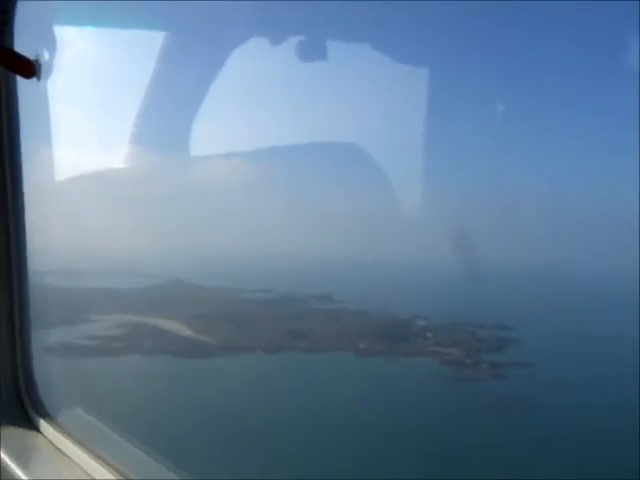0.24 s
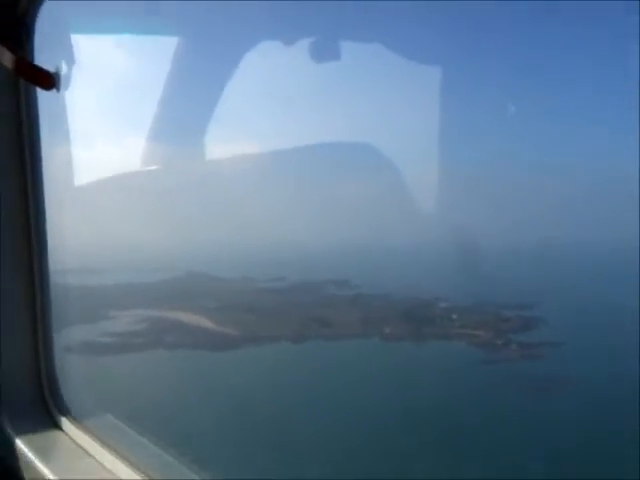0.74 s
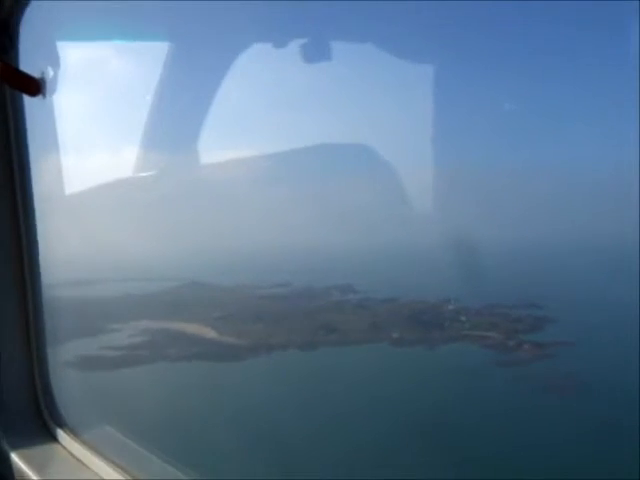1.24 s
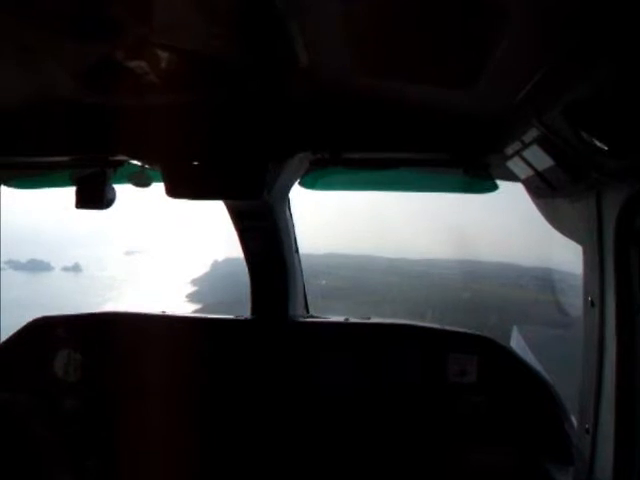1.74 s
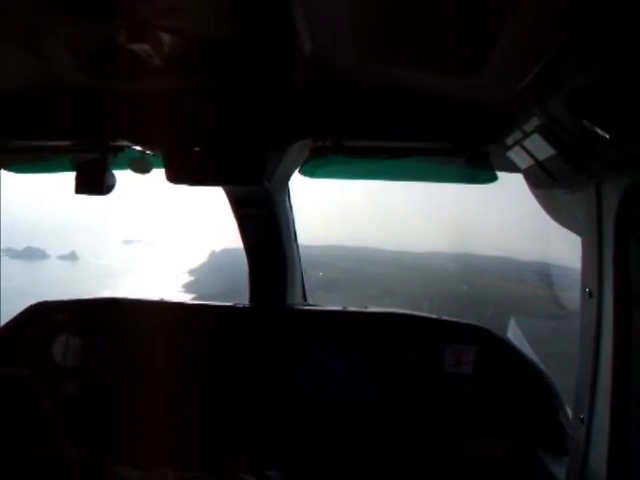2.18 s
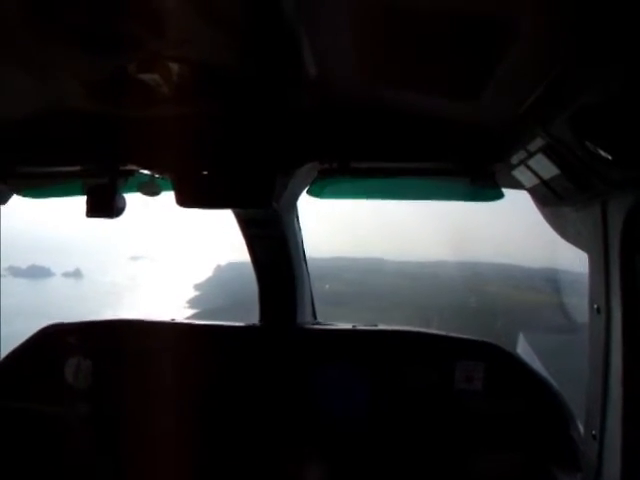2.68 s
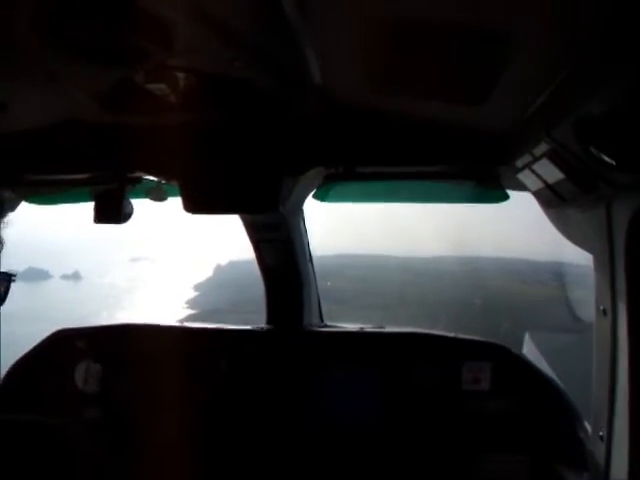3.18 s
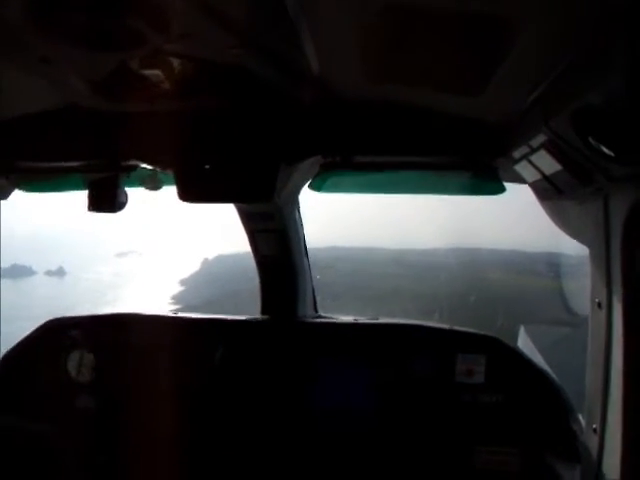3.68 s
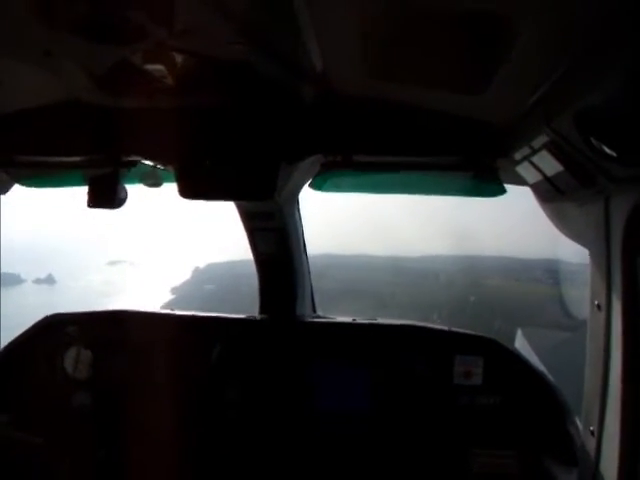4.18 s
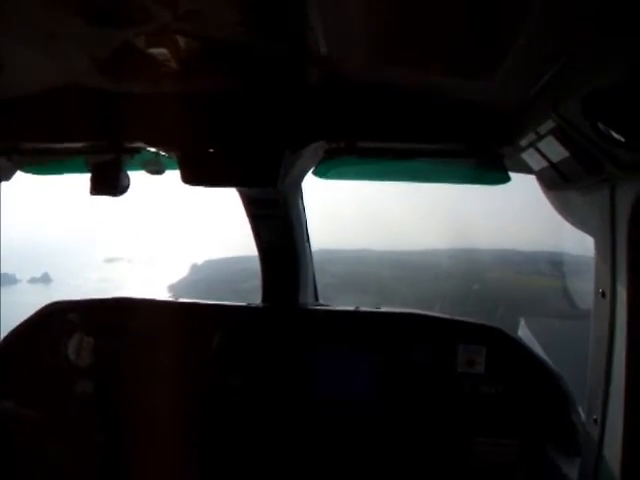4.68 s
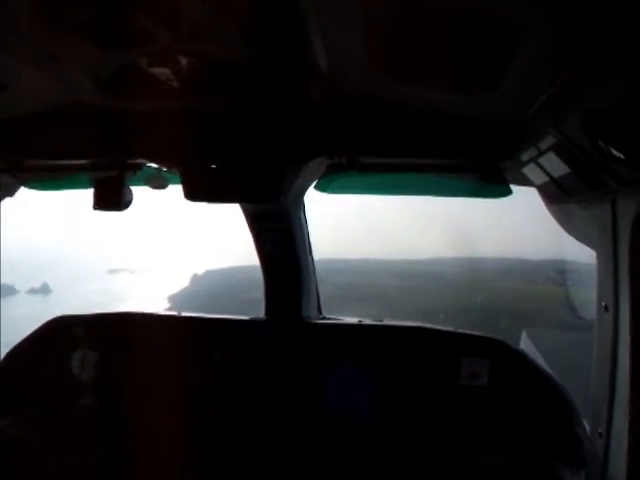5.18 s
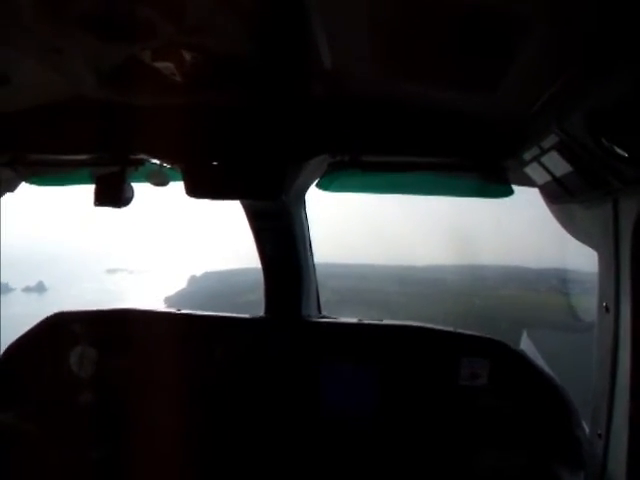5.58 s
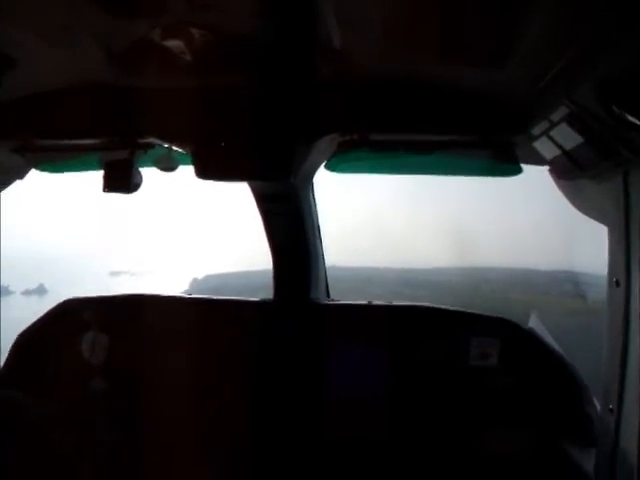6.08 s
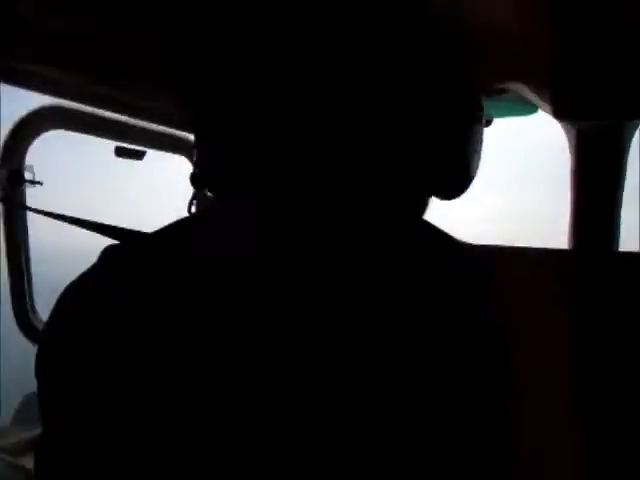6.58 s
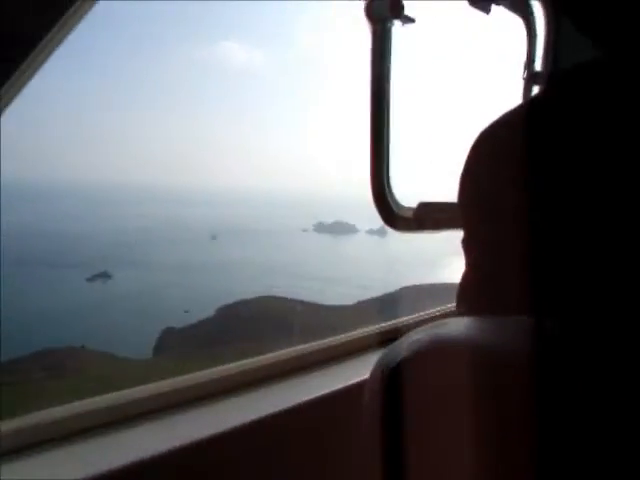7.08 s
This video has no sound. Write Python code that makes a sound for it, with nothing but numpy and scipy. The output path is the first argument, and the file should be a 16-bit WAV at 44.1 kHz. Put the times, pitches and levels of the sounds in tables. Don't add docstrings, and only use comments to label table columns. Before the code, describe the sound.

Inside the cabin of a small piston-engined propeller aircraft in flight, captured close by a compressed microphone with dull, limited treble. From 0 to 1.3 s the engines turn in step as one low, smooth drone around 115 Hz; the deep tone thins near 0.3 s and swells back, over airflow rumble and faint whistling vents around 1 kHz. At about 1.33 s there is an abrupt silence of a fortieth of a second. The drone returns higher, rougher and more buzzing, climbing until roughly 2.6 s, then easing slightly. Engines at different speeds throb quickly, slower at first and then about a dozen beats a second, with a low propeller thrum, roaring and hissing air and light trim buzz. From 6.25 to 7 s the engine tone changes colour, briefly hollower, as the listener turns to the side window. The drone continues to the end at 7.3 s.

```python
import sys
import numpy as np
from scipy import signal
from scipy.io import wavfile

SR = 44100
rng = np.random.default_rng(int(sys.argv[2]) if len(sys.argv) > 2 else 0)


def level_to_linear(level):
    exponent = np.asarray(level, float) / 20
    return 10 ** exponent


def pcm_store(signal):
    levels = np.round(np.clip(np.atleast_2d(signal), -1, 1) * 32767)
    wavfile.write(sys.argv[1], SR, levels.astype(np.int16).T)


N = 323241

DROPOUT_S = (1.33446, 1.35946)

# cruise [level/dB], its fall [dB/s], share of the slipstream swing [dB/dB],
# later [level/dB], its share [dB/dB]
AIRFLOW = [
    (-31, .1, .1, -28, 0.34),
    (-36.5, -0.2, 0.48, -36.5, 0.97),
    (-40, 2, 0.18, -41.5, 1.1),
    (-52, -1.7, 0.54, -42.5, 1.1),
]
# [f/Hz], spectral density [level/dB]
AIR_CRUISE = [(20, 4.5), (60, 2), (150, 2), (300, -7), (500, -12), (850, -22), (1050, -21.5), (1300, -20),
              (1600, -23), (2500, -20.5), (4500, -24), (6000, -31.5), (7500, -26.5)]
AIR_LATER = [(20, 1), (60, 4.5), (150, 0), (300, -7), (500, -15), (850, -19), (1050, -18.5), (1300, -23.5),
             (1600, -23.5), (2500, -21.5), (4500, -22.5), (6000, -29.5), (7500, -23.5)]
# [t/s], [level/dB]
SLIPSTREAM = [(0, -0.2), (.2, 2), (.5, 1.4), (1.05, 0.2), (1.33, 3), (1.36, 3), (1.55, 2.5), (2.2, 1.5),
              (3.4, -0.1), (4.3, -0.2), (4.9, 0.7), (5.5, -0.1), (6.7, 0.7), (7.33, -2.5)]
# [f/Hz], bandwidth [f/Hz], rms [level/dB]
VENT = [
    (980, 69, -48.5),
    (1022, 47, -45),
    (1140, 70, -50.5),
    (1544, 120, -53),
    (2560, 330, -55),
]
# [f/Hz], bandwidth [f/Hz], against the sizzle [level/dB]
TRIM = [
    (4700, 430, -9),
    (6180, 290, -8.5),
]

# [t/s], [f/Hz]
CRUISE_SPEED = [
    (0.0, 115.0),
    (0.22, 114.18),
    (0.44, 114.34),
    (0.67, 114.6),
    (0.89, 114.98),
    (1.11, 115.15),
    (1.33, 115.06),
]
# [t/s], [f/Hz]
NEAR_SPEED = [(1.36, 127.17), (1.66, 131.29), (1.96, 134.15), (2.26, 135.84), (2.6, 136.68), (3.0, 136.62),
              (3.5, 135.33), (4.34, 133.59), (5.3, 134.08), (6.4, 133.61), (7.33, 132.93)]
FAR_SPEED = [
    (1.36, 122.58),
    (1.8, 124.05),
    (2.95, 124.2),
    (4.6, 122.72),
    (5.6, 122.11),
    (6.5, 120.81),
    (7.33, 119.38),
]
TAIL_SPEED = [
    (1.36, 117.68),
    (1.96, 114.15),
    (2.6, 114.37),
    (3.8, 112.2),
    (4.94, 113.15),
    (6.14, 112.01),
    (6.73, 113.47),
    (7.33, 110.59),
]
START_TURNS = [
    .25,
    .989,
    .05,
    .78,
]

# [sixths of the firing rate], [level/dB]
CRUISE_ORDERS = [(1, 0.5), (2, -7), (3, -10.5), (4, 2), (5, -6.5), (8, -11), (9, -12.5), (30, -23)]
CRUISE_SLIP_ORDERS = [(9, -16.5), (18, -25)]
TAIL_ORDERS = [(2, -38.5), (4, -28.5), (6, -32), (8, -42.5), (12, -54.5)]
FAR_ORDERS = [(2, -37.5), (3, -33.5), (6, -21), (12, -39.5), (18, -48.5), (24, -52), (30, -56.5)]
NEAR_LOW_ORDERS = [(1, -36), (3, -30.5), (4, -47.5), (8, -41), (9, -41.5)]
NEAR_BARK_ORDERS = [(24, 0.9)]
NEAR_MID_ORDERS = [(36, 0.78)]
NEAR_WHINE_ORDERS = [(60, -0.5), (66, -6), (72, 0), (78, -10.5), (84, -0.9), (90, -6.5)]

GOVERNED_HZ = 133.8
NEAR_LAYERS = [
    (-13, -.2, 0.64),
    (-22.5, .3, 0),
    (-38.5, -0.0062, 0),
    (-34, 0.64, 0.4),
    (-48.5, 1, 1.85),
    (-42, -1.2, -2),
    (-57, -.4, 3.2),
    (-38, -1, -0.3),
    (-55, -.3, 3),
    (-48, 0.62, -0.4),
]
TURN_S = [
    6.25,
    6.5,
    6.72,
    7.0,
]
# leaning, node, side [level/dB]
NEAR_TURN = [
    (2, 2.5, 0.9),
    (-2.2, -11.5, -3),
    (6.5, -1, 6.5),
    (-2.5, -0.5, -0.3),
    (11, 4, 2),
    (-1.5, -4, -3),
    (5.5, -7, -1),
    (1.5, 0.5, -3.5),
    (9.5, 6, 2.5),
    (-0.5, -1, -2.5),
]


def rms_one(x):
    return x / np.sqrt(np.mean(x ** 2) + 1e-20)


def in_time(rows):
    s, *columns = np.transpose(rows)
    return [np.interp(np.arange(N) / SR, s, column) for column in columns]


def at_hz(points, hz):
    f, db = np.array(points).T
    return np.interp(np.log(hz), np.log(f), db)


def drift(rate_hz):
    r = np.exp(-80 * np.pi * rate_hz / SR)
    noise = rng.standard_normal(N // 40 + 2002)
    slow = signal.lfilter([1], [1, -2 * r, r * r], noise)[2000:]
    return np.interp(np.arange(N) / 40, np.arange(len(slow)), rms_one(slow))


def whistles(modes, flicker_db):
    out = 0
    for hz, width_hz, db in modes:
        r = np.exp(-np.pi * width_hz / SR)
        poles = [1, -2 * r * np.cos(2 * np.pi * hz / SR), r * r]
        x = rng.standard_normal(N)
        for _ in range(2):
            x = signal.lfilter([1, 0, -1], poles, x)
        out = out + level_to_linear(db + flicker_db * drift(5.3)) * rms_one(x)
    return out


def vents(later):
    slipstream_db, = in_time(SLIPSTREAM)
    return ~later * level_to_linear(slipstream_db) * whistles(VENT, flicker_db=0.5)


def air_levels(later, beat_turns):
    throb_peak_db, fade_s, sharpness, lag_turns = 3.5, 0.67, 1.4, .73
    s = np.arange(N) / SR
    swing_db, = in_time(SLIPSTREAM)
    fade = np.exp(-np.maximum(s - DROPOUT_S[1], 0) / fade_s)
    beat = np.cos(2 * np.pi * (beat_turns - lag_turns))
    throb_db = throb_peak_db * fade * (np.exp(sharpness * (beat - 1)) - .4)
    levels_db = []
    for db, fall, share, late_db, late_share in AIRFLOW:
        cruise_db = db - fall * s + share * swing_db
        levels_db.append(np.where(later, late_db + late_share * swing_db + throb_db, cruise_db))
    return level_to_linear(levels_db)


def band_shares(colour, centres, layer):
    share = level_to_linear(at_hz(colour, centres)) * np.sqrt(centres)
    return share / np.sqrt(np.bincount(layer, share ** 2))[layer]


def airflow(later, levels, shake, patchy_db):
    edges = 18 * 2 ** np.arange(0, 9.4, 1 / 3)
    centres = np.sqrt(edges[1:] * edges[:-1])
    layer = np.searchsorted([290, 2000, 4300, 8500], centres).clip(0, 3)
    cruise_share = band_shares(AIR_CRUISE, centres, layer)
    later_share = band_shares(AIR_LATER, centres, layer)
    white = rng.standard_normal((2, N + SR))
    gust = drift(7.0)
    shade_low_hz, shade_high_hz, shade_db = 850, 2100, -2.5
    shade = level_to_linear(np.interp(np.arange(N) / SR, TURN_S[1:3], [0, shade_db]))
    out = np.zeros((4, N))
    for k, (low, high) in enumerate(zip(edges, edges[1:])):
        sos = signal.butter(2, [low, high], "band", fs=SR, output="sos")
        band = rms_one(signal.sosfilt(sos, white[k % 2])[SR:])
        band = band * level_to_linear(patchy_db * (0.61 * gust + drift(15.0)))
        if shade_low_hz < centres[k] < shade_high_hz:
            band = band * shade
        out[layer[k]] += np.where(later, later_share[k], cruise_share[k]) * band
    out[3] = level_to_linear(7) * out[3] + later * whistles(TRIM, flicker_db=0.8)
    out[2:] *= shake
    return np.sum(levels * out, axis=0)


def firing_turns(speed, start_turn):
    turns = np.cumsum(in_time(speed)[0]) / SR
    return turns - turns[round(speed[0][0] * SR)] + start_turn


def tones(turns, orders, wobble_db):
    out = 0
    for sixths, db in orders:
        k = sixths / 6
        lag = .24 * (k - 1) - .15 * (k - 1) * (k - 2)
        wave = np.sqrt(2) * np.cos(2 * np.pi * (k * turns - lag))
        out = out + level_to_linear(db + wobble_db * drift(3.1)) * wave
    return out


def loud_engine(turns, firing_db, octave_db, wobble_db):
    firing = level_to_linear(firing_db) * tones(turns, [(6, 0)], wobble_db)
    octave = level_to_linear(octave_db) * tones(turns, [(12, 0)], wobble_db)
    return firing + octave


def cruise_levels():
    s = np.arange(N) / SR
    opposed = np.exp(-((s - 0.34) / .14) ** 2)
    sag = np.exp(-((s - .5) / .12) ** 2)
    firing_db = -25 + 3 * s - 24 * opposed
    octave_db = -23 - 7.5 * sag
    crank_db = -32.5 + 3.0 * sag
    return firing_db, octave_db, crank_db


def engines_in_step(turns):
    firing_db, octave_db, crank_db = cruise_levels()
    out = level_to_linear(firing_db) * tones(turns, CRUISE_SLIP_ORDERS, wobble_db=3.0)
    out += loud_engine(turns, firing_db, octave_db, wobble_db=1.35)
    return out + level_to_linear(crank_db) * tones(turns, CRUISE_ORDERS, wobble_db=1.0)


def tail_engine():
    return tones(firing_turns(TAIL_SPEED, START_TURNS[3]), TAIL_ORDERS, wobble_db=-1.3)


def far_engine(turns):
    return tones(turns, FAR_ORDERS, wobble_db=2.0)


def near_levels(speed_hz):
    s = np.arange(N) / SR
    off_hz = speed_hz - GOVERNED_HZ
    levels_db = []
    for (db, below, above), turn in zip(NEAR_LAYERS, NEAR_TURN):
        speed_db = below * np.maximum(-off_hz, 0) + above * np.maximum(off_hz, 0)
        levels_db.append(db + speed_db + np.interp(s, TURN_S, [0, *turn]))
    return levels_db


def near_engine(turns):
    firing_db, octave_db, *upper_db = near_levels(in_time(NEAR_SPEED)[0])
    third_db, bark_db, mid_db, seventh_db, whine_db, fifth_db, ninth_db, eighth_db = upper_db
    out = loud_engine(turns, firing_db, octave_db, wobble_db=0.0)
    out += tones(turns, NEAR_LOW_ORDERS, wobble_db=1.0)
    out += level_to_linear(third_db) * tones(turns, [(18, -0.52)], wobble_db=0.0)
    out += level_to_linear(bark_db) * tones(turns, NEAR_BARK_ORDERS, wobble_db=-0.05)
    out += level_to_linear(mid_db) * tones(turns, NEAR_MID_ORDERS, wobble_db=0.1)
    out += level_to_linear(seventh_db) * tones(turns, [(42, -0.83)], wobble_db=0.4)
    out += level_to_linear(whine_db) * tones(turns, NEAR_WHINE_ORDERS, wobble_db=0.8)
    out += level_to_linear(fifth_db) * tones(turns, [(30, 0)], wobble_db=0.5)
    out += level_to_linear(ninth_db) * tones(turns, [(54, 0)], wobble_db=2.4)
    return out + level_to_linear(eighth_db) * tones(turns, [(48, 0.0024)], wobble_db=2.0)


def scene():
    later = np.arange(N) / SR > DROPOUT_S[0]
    cruise = firing_turns(CRUISE_SPEED, START_TURNS[0])
    near = firing_turns(NEAR_SPEED, START_TURNS[1])
    far = firing_turns(FAR_SPEED, START_TURNS[2])
    shake = level_to_linear(1.1 * np.cos(2 * np.pi * (np.where(later, near, cruise) - .2)))
    air = airflow(later, air_levels(later, near - far), shake, patchy_db=0.51)
    apart = tail_engine() + far_engine(far) + near_engine(near)
    engines = np.where(later, apart, engines_in_step(cruise))
    return (air + vents(later) + engines)[None]


def gain_control(x, target_db, squeeze, follow_s):
    r = np.exp(-1 / (follow_s * SR))
    power = signal.lfilter([(1 - r) ** 2], [1, -2 * r, r * r], x ** 2) + 1e-4
    power[:, :800] = power[:, 800:801]
    return x * (level_to_linear(target_db) ** 2 / power) ** (np.clip(squeeze, 0, 1) / 2)


def roll_off(x):
    return signal.sosfilt(signal.butter(12, 16500, fs=SR, output="sos"), x)


def record(dry):
    x = gain_control(dry, target_db=-11.5, squeeze=0.64, follow_s=0.0065)
    x = np.tanh(x)
    x = signal.sosfilt(signal.cheby2(12, 70, 8850, fs=SR, output="sos"), x)
    x = signal.sosfilt(signal.ellip(10, .5, 45, 8260, fs=SR, output="sos"), x)
    x = x - .004
    s = np.arange(N) / SR
    x = x * ((s < DROPOUT_S[0]) | (s > DROPOUT_S[1]))
    return roll_off(x)


dry = scene()
out = record(dry)
pcm_store(out)
```